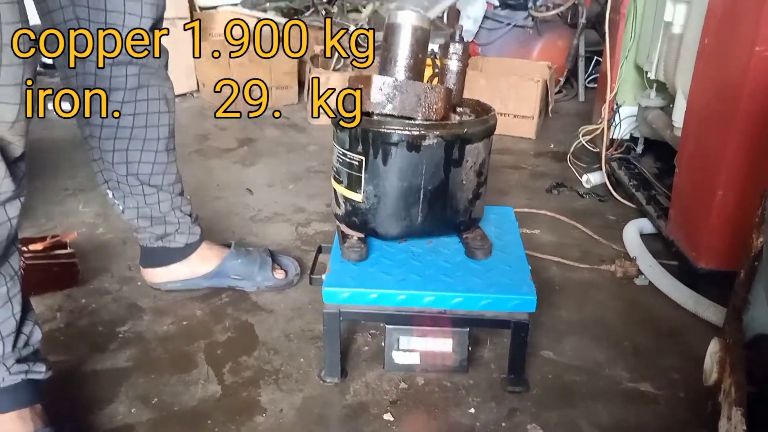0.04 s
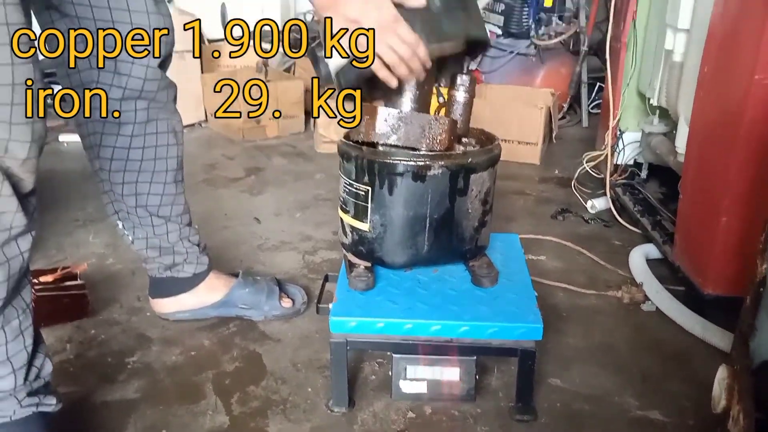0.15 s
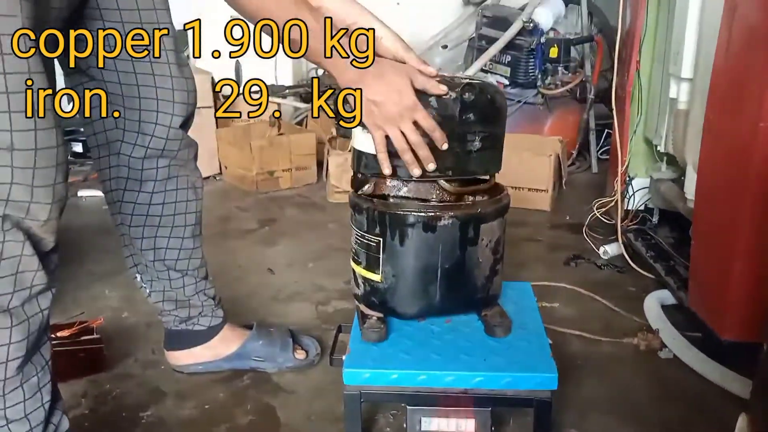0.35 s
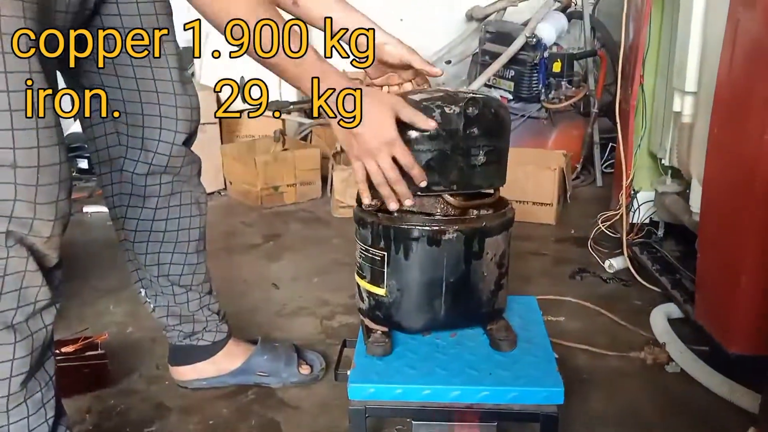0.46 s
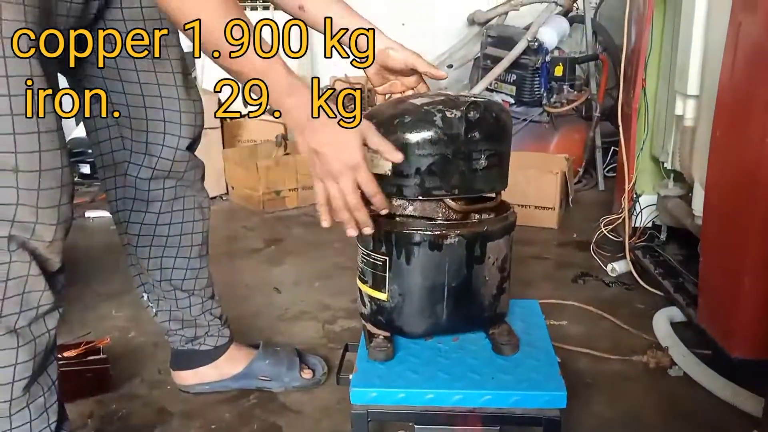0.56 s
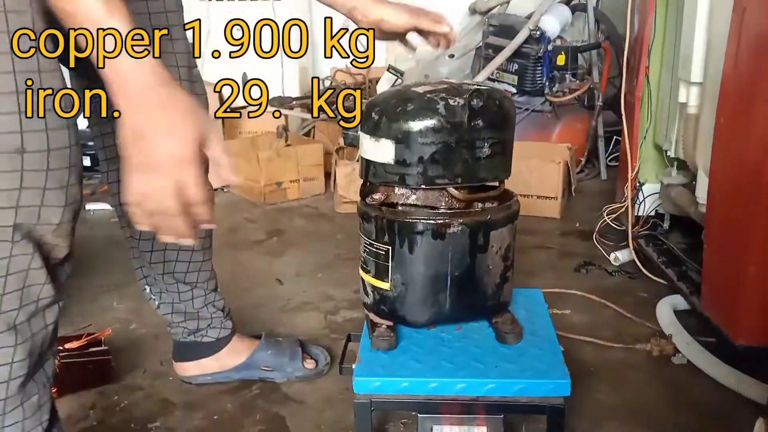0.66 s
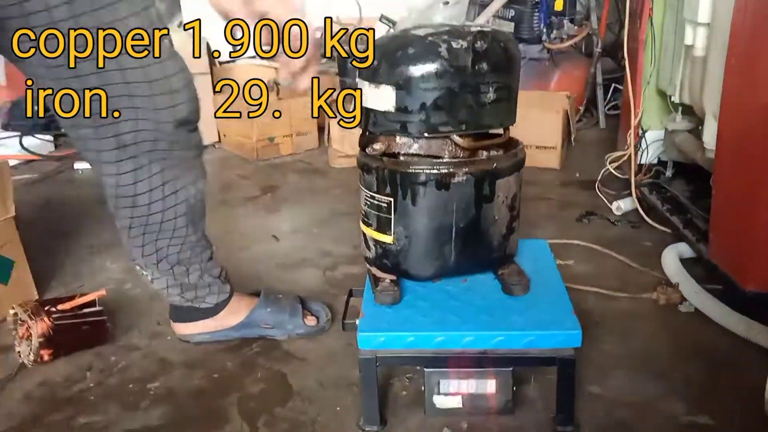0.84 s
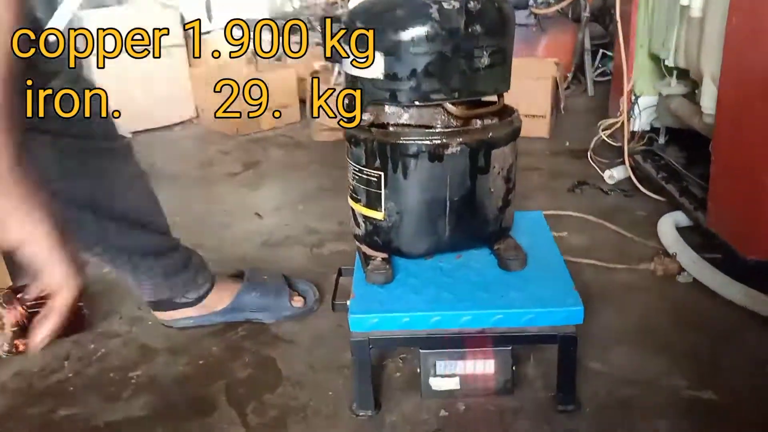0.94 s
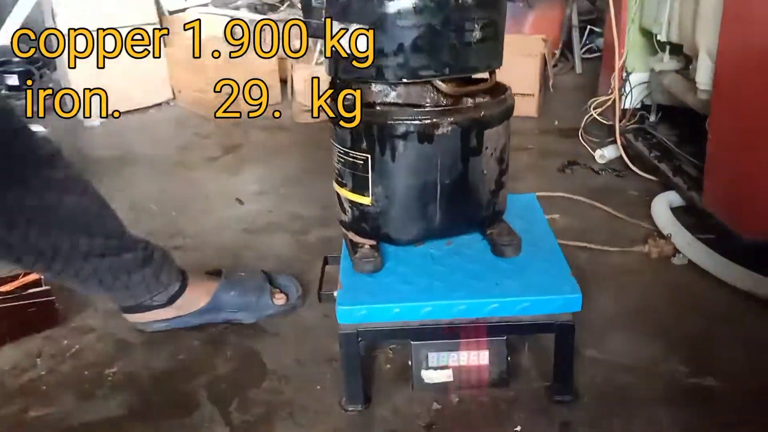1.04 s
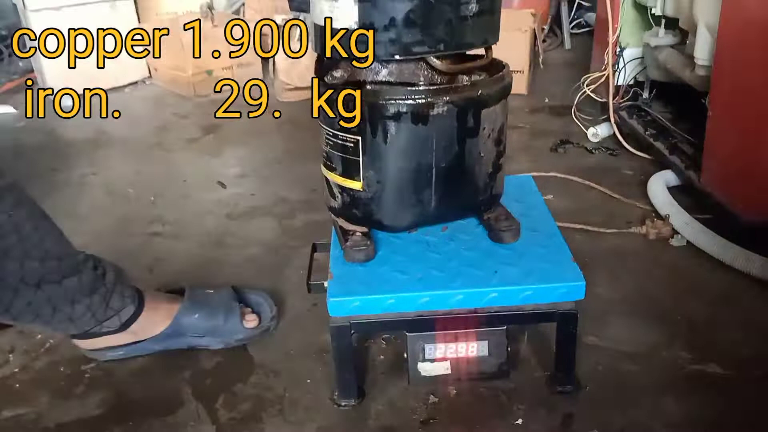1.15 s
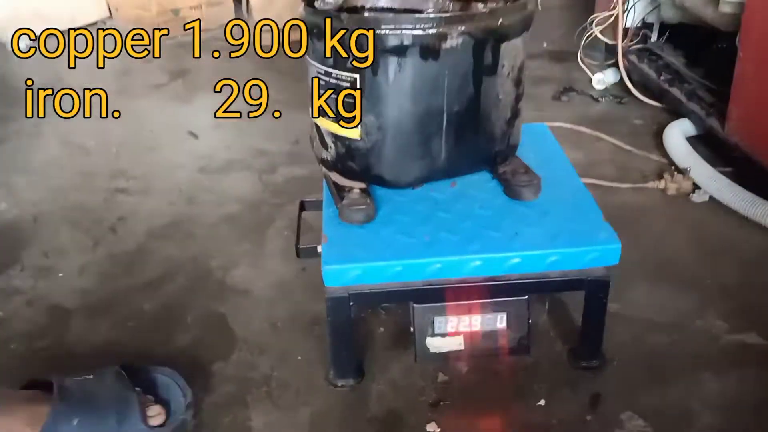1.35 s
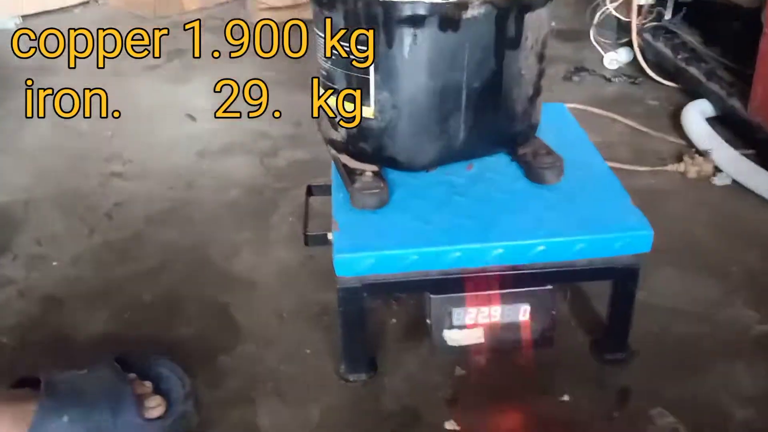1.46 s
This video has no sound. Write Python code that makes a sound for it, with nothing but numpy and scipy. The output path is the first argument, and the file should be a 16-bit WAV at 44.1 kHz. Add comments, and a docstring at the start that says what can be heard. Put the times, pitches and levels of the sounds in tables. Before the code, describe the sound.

Close microphone in a workshop: faint stirrings, then a hard double-edged steel clank at the start, its ring dropping in steps, followed by soft ticks, gritty foot scuffs, and a late quiet knock over low rumble and hiss.

```python
"""A heavy steel lid is knocked down onto its shell on a platform scale in a workshop: many ringing modes.
Each ring's fading jumps ahead at regular splices, as in sound sped up by dropping pieces: it falls in steps.
A late bump is made of short dull platform tones with a ring around it. A sandal scuffs the floor as gritty
noise, and very high, faint squeaks are narrow noise. Low rumble, hum and hiss of shaped noise fill the shop."""
import sys
import numpy as np
from scipy import signal
from scipy.fft import rfft, irfft
from scipy.io import wavfile
from scipy.ndimage import uniform_filter1d

SR = 44100
rng = np.random.default_rng(int(sys.argv[2]) if len(sys.argv) > 2 else 0)


def store_pcm(level_fs):
    """Save levels as 16-bit WAV."""
    pcm = np.round(np.clip(level_fs, -1, 1) * 32767).astype(np.int16)
    wavfile.write(sys.argv[1], SR, np.atleast_2d(pcm).T)


def attenuation_scalar(level_db):
    """Turn a level in dB into a linear amplitude multiplier (20 dB per decade)."""
    decades = np.asarray(level_db, float) / 20
    return 10 ** decades


N = 66150  # samples: 1.5 s


def evened(x):
    """Scales a sound to an rms of 1."""
    return x / np.sqrt(np.mean(x ** 2) + 1e-20)


def read(points, hz):
    """Reads a table at any pitch, with straight lines on a log-frequency axis."""
    f, value = np.transpose(points)
    return np.interp(np.log(hz + 1), np.log(f + 1), value)


def curve(points):
    """Turns a level curve in dB into a gain for every sample."""
    return attenuation_scalar(np.interp(np.arange(N) / SR, *np.transpose(points)))


def add(mix, start_s, sound):
    """Mixes a sound in at its start time, cutting off what runs past the end."""
    part = mix[:, round(start_s * SR):][:, :sound.shape[-1]]
    part += sound[..., :part.shape[1]]


def swell(start_s, length_s):
    """A smooth rise and fall, half a sine long."""
    return np.sin(np.pi * np.clip((np.arange(N) / SR - start_s) / length_s, 0, 1))


def ring(t, age, hz, db, t60, left, right, lean_db):
    """Ringing modes as a sum of dying sines, with one set of starting phases per channel."""
    fading = 3 * np.log(10) * age / t60[:, None]  # 60 dB down when the age reaches t60
    turns = np.exp(2j * np.pi * hz[:, None] * t - fading)
    gains = attenuation_scalar(db + np.array([[.5], [-.5]]) * lean_db)
    starts = np.exp(1j * np.array([left, right]))
    return np.imag(gains * starts @ turns)


def stepped_age(start_s, t):
    """Age of a ring: it runs with time and jumps ahead at every splice, so the fading falls in steps."""
    piece_s, piece_at_s = 2048 / 48000, .2022  # spacing of the splices, time of one of them
    dropped_s, splice_s = 0.16, 0.0064  # time lost at each splice, length of its crossfade
    pieces = np.floor((start_s + t - piece_at_s) / piece_s)
    first = np.floor((start_s + splice_s - piece_at_s) / piece_s)
    splices = np.maximum(pieces - first, 0)
    return t + dropped_s * uniform_filter1d(splices, max(round(splice_s * SR), 1), mode="nearest")


def steel_ring(start_s, level_db, centre_hz, octaves, long, chance):
    """One burst of ringing from the set of steel modes, strongest near the colour's centre."""
    # strong modes of the steel shell: pitch_hz, level_db, t60_s (before the burst's ring length factor)
    strong_modes = [(270, -4, 0.74), (439, -4, 0.13), (467.2, 1.5, 0.12), (515.8, 1.5, 0.29),
                    (715, 0, 0.17), (762.6, -7.5, 0.67), (1291, -8, 0.12), (1585, 5.5, 0.082),
                    (1848, -7.5, 0.22), (1951, -4, 0.48), (2437, -1, 0.17), (2775, -6, 0.45),
                    (3265, -17, .4), (3776, -4, 0.2), (4100, -2, 0.093), (4440, -16, 0.16),
                    (4670, -8, 0.22), (5115, -6, 0.13), (5790, -5, 0.33), (6210, -7.5, 0.43),
                    (6730, -13, 0.34), (7920, -19.5, 0.33), (8430, -18, .3), (9055, -20, 0.35),
                    (9900, -44, 0.14), (11340, -27.5, 0.72), (11660, -36, .4), (13300, -20, .3),
                    (14600, -25, 0.4)]
    # many weak modes and echoes, general colour: pitch_hz, level_db
    crowd_colour = [(71, -57), (120, -14), (331, -13), (506, -5.5), (1420, -8), (1570, -8.5), (1740, -12.5),
                    (2410, -9.5), (3010, -15.5), (3920, -14), (6250, -20), (7350, -38.5), (15200, -52)]
    # middle ring time of the weak modes, before the same factor: pitch_hz, t60_s
    crowd_ring = [(150, 0.2), (500, 0.32), (2000, 0.35), (6000, 0.55), (15000, 0.28)]
    # left-right balance of the ring: pitch_hz, left_minus_right_db
    balance = [(60, -10), (180, -5.5), (540, 0), (1630, -0.5), (4920, -0.5), (14800, -8)]
    strong_scatter = 0.2  # share of a cycle by which the strong modes start out of step
    crowd_db, crowd_spread_db, crowd_same = -4.5, 2.5, 0.5
    rise_cycles, far_db = 0.74, 25.5  # rise time in cycles of the centre; deepest cut of far modes

    t = np.arange(round(.16 * SR)) / SR
    place, phase, turn = chance
    strong_hz, strong_db, strong_t60 = np.transpose(strong_modes)
    count = len(strong_hz)

    many_hz = 120 + 15200 * place ** 2  # packed closer at low pitches
    many_db = read(crowd_colour, many_hz) + 5 * np.log10(many_hz / 1000) + crowd_db
    many_db = many_db + crowd_spread_db * turn[::-1] * np.clip(many_hz / 5000, .4, 1.6)
    many_t60 = read(crowd_ring, many_hz) * (.6 + .8 * phase)

    hz = np.r_[strong_hz, many_hz]
    db = np.r_[strong_db, many_db]
    t60 = long * np.r_[strong_t60, many_t60]
    db = db - np.minimum(7.0 * (np.log2(hz / centre_hz) / octaves) ** 2, far_db)

    # the channels drift out of step as pitch rises to 900 Hz
    left = 2 * np.pi * np.r_[strong_scatter * phase[:count], phase[::-1]]
    apart = np.r_[turn[:count], np.pi * (1 - crowd_same) * turn]
    right = left + apart * np.minimum(hz / 900, 1)

    sound = ring(t, stepped_age(start_s, t), hz, db, t60, left, right, read(balance, hz))
    sound = sound / np.sqrt(np.sum(attenuation_scalar(db) ** 2) / 2)  # the same strength however many modes sound
    return attenuation_scalar(level_db) * sound * (1 - np.exp(-t * centre_hz / rise_cycles))


def steel_rings():
    """Knocks and ringing tails of the lid and shell, then the ring around a late bump and its tail."""
    # bursts (from 1.4405 s on: the late bump's): start_s, level_db, centre_hz, colour_width_octaves,
    # ring_length_factor
    bursts = [(.043, -33.5, 300, 2, .5), (0.056, -45, 248, 0.93, 0.65), (.1, -42, 436, 1.2, .5),
              (0.162, -45.5, 2960, 4.5, 1.8), (.2027, -13, 860, 0.86, 0.055), (.2032, -33.5, 6900, 1.2, 2),
              (0.208, -21.5, 1570, 1.12, 1.6), (0.2184, -14.5, 4120, 0.25, 0.81),
              (.2195, -28.5, 9700, 0.44, 0.13), (.2213, -9, 490, 0.5, .25),
              (.2216, -11.5, 910, 0.56, 0.056), (0.2261, -14, 1800, 1.96, 2.1),
              (0.2422, -19, 2380, 2.26, 1.46), (0.2423, -28, 270, 0.29, 0.59),
              (.2515, -24, 3980, 0.34, .15), (.277, -39.5, 600, 1.2, .3), (.371, -40, 780, 0.58, 1.07),
              (.372, -48, 270, 0.38, 0.48), (0.395, -48.5, 4100, 0.13, 0.43),
              (.426, -43.5, 3000, 1.8, 0.69), (0.445, -40, 1060, 0.58, 0.14), (.63, -48.5, 620, 0.66, 0.82),
              (0.721, -52, 596, 1.1, 0.47), (.962, -43, 450, 2.3, 0.28), (1.4405, -38, 2000, .8, 0.11),
              (1.447, -31, 5850, 2.7, 0.16), (1.463, -42, 1480, 0.35, 1.4), (1.481, -44.5, 1000, 0.45, 1.8)]
    out = np.zeros((2, N))
    for row in bursts:
        place = (np.arange(300) + rng.random(300)) / 300  # spread evenly, with a little chance
        chance = (place, rng.random(300), rng.standard_normal(300))
        add(out, row[0], steel_ring(*row, chance))
    return out


def platform_bumps():
    """Bumps set off the platform's dull modes, which die within a fraction of a second."""
    # modes of the platform: pitch_hz, level_db (before the bump's level), t60_s
    dull_modes = [(110, -2.5, 0.13), (175, 2.5, 0.043), (235, -32, 0.025), (888, -7.5, 0.055),
                  (1000, -0.5, 0.044), (1060, 9, 0.026), (1440, -3.5, 0.028), (1700, 4, 0.042),
                  (2010, 5, 0.019), (2580, -0.5, 0.032), (3230, -5.5, 0.026), (5104, -4.5, 0.024),
                  (6400, -21, 0.011)]
    # bumps: start_s, level_db (added to each mode's level)
    hits = [(1.4467, -32), (1.4505, -31.5), (1.457, -49)]
    rise_s, lean_db = 0.00097, -7  # the right side is louder
    out, t = np.zeros((2, N)), np.arange(SR // 10) / SR
    hz, db, t60 = np.transpose(dull_modes)
    for start_s, level_db in hits:
        left = 2 * np.pi * rng.random(len(hz)) * (hz > 500)  # low modes start in step
        right = left + 0.76 * np.minimum(hz / 1000, 2)
        bump = ring(t, t, hz, db + level_db, t60, left, right, lean_db)
        add(out, start_s, bump * (1 - np.exp(-t / rise_s)))
    return out


def noise(colour, patchy_db, flicker_db):
    """Two-channel noise from random short-time spectra, uneven in patches and flickering as a whole."""
    # likeness of left and right: pitch_hz, likeness (1 same, 0 unrelated, below 0 opposed)
    likeness = [(60, 1), (150, 1), (380, 0.7), (940, -0.11), (2360, -0.1), (5910, 0.5), (14800, 1)]
    frames, hz = N // 128 + 9, np.fft.rfftfreq(512, 1 / SR)
    a, b, c, d, patches = rng.standard_normal((frames, 257, 5)).T
    patches = uniform_filter1d(patches, size=5, axis=0)  # along pitch
    patches = evened(uniform_filter1d(patches, size=14, axis=1))  # along time
    flicker = evened(uniform_filter1d(rng.standard_normal(frames), size=4))

    same = np.clip(read(likeness, hz), -1, 1)[:, None]
    left = a + 1j * b
    right = same * left + np.sqrt(1 - same ** 2) * (c + 1j * d)
    spectra = np.array([left, right]) * attenuation_scalar(patchy_db * patches + flicker_db * flicker)
    x = signal.istft(spectra, nperseg=512, noverlap=384)[1][:, :N]
    gains = attenuation_scalar(read(colour, np.fft.rfftfreq(N, 1 / SR)))
    return evened(irfft(rfft(x) * gains, N))


def scuffs():
    """A sandal on concrete: gritty friction noise swells and fades with each slide."""
    # colour of the friction: pitch_hz, level_db
    grit_colour = [(410, -21.5), (700, -10), (883, -9), (1040, -7), (1330, -5.5), (1500, -3), (2090, 3),
                   (3740, -12.5), (6180, -9), (9840, -33.5), (15200, -31.5)]
    # slides: start_s, length_s, level_db
    slides = [(0.711, 0.15, -50.5), (1.047, 0.19, -46), (1.206, 0.25, -45)]
    gain = sum(attenuation_scalar(db) * swell(start_s, length_s) ** 0.65 for start_s, length_s, db in slides)
    return noise(grit_colour, 4.3, 0.7) * gain


def squeaks():
    """Fuzzy high whistles: slow random wobble, made by two equal resonances, is moved up to each pitch."""
    # whistles: start_s, length_s, level_db, pitch_hz
    whistles = [(.535, 0.042, -94, 13400), (.64, .045, -90, 13750), (0.836, 0.24, -75.5, 11880)]
    resonance_hz = 190  # width of each resonance; the two together are narrower
    r = np.exp(-np.pi * resonance_hz / SR)
    t, out = np.arange(N) / SR, 0
    for start_s, length_s, db, hz in whistles:
        grain = rng.standard_normal(N) + 1j * rng.standard_normal(N)
        fuzz = signal.lfilter([1], np.poly([r, r]), grain)
        whistle = evened(np.real(fuzz * np.exp(2j * np.pi * hz * t)))
        out = out + attenuation_scalar(db) * swell(start_s, length_s) * whistle
    return out


def rumble():
    """Low noise of the shop, rising and falling along a level curve."""
    # colour: pitch_hz, level_db
    low_colour = [(12, -66), (20, -36), (32, -39), (45, -18), (86, -2), (146, -8.5), (190, -9), (250, -48),
                  (420, -120)]
    # level curve in three stretches: start_s, level_db
    low_level = [
        [(0.0, -44), (0.016, -40), (0.094, -48), (0.114, -43), (0.138, -40), (0.182, -43.5), (0.2, -45)],
        [(0.3, -55), (0.384, -51.5), (0.4, -56), (0.558, -51.5), (1.144, -48), (1.21, -50), (1.228, -52),
         (1.31, -48.5), (1.394, -51), (1.425, -43)],
        [(1.475, -46.5), (1.479, -46.5), (1.5, -51)],
    ]
    return curve(sum(low_level, [])) * noise(low_colour, 0.51, 0.99)


def hum():
    """A fuzzy band of noise above the deepest rumble, with a level curve of its own."""
    # colour: pitch_hz, level_db
    band_colour = [(150, -15), (200, 2.5), (255, 12), (300, 4), (360, -50.5)]
    # level curve: start_s, level_db
    band_level = [(0, -46), (.1, -51), (.2, -46.5), (.33, -53), (.45, -53), (.7, -67), (.85, -59.5),
                  (1.0, -55), (1.1, -60.5), (1.3, -65), (1.5, -59)]
    return curve(band_level) * noise(band_colour, patchy_db=.9, flicker_db=1.8)


def hiss():
    """Broad shop noise, strongest in the middle pitches, with a slowly moving level."""
    # colour: pitch_hz, level_db
    broad_colour = [(190, -13), (330, -10.5), (680, -2.5), (748, -10.5), (858, -7), (996, -7), (1080, -5.5),
                    (1610, -7.5), (2730, -7.5), (3540, -21.5), (6460, -22), (8600, -43.5), (11200, -80),
                    (18900, -120)]
    # level curve: start_s, level_db
    broad_level = [(0, -42.5), (.06, -44), (.14, -44.5), (.3, -46), (.48, -51), (.65, -46.5), (.8, -50.5),
                   (.9, -48), (1.0, -46), (1.2, -50), (1.5, -44.5)]
    return curve(broad_level) * noise(broad_colour, patchy_db=1.9, flicker_db=1.0)


def scene():
    """Steel rings, platform bumps, scuffs and squeaks over the shop's rumble, hum and hiss."""
    struck = steel_rings() + platform_bumps()
    background = rumble() + hum() + hiss()
    return struck + scuffs() + squeaks() + background


def low_pass(x):
    """Removes everything above the highest recorded frequency."""
    return signal.sosfilt(signal.butter(12, 15400, fs=SR, output="sos"), x)


def record(dry):
    """Rounds off the peaks smoothly under a ceiling and finishes the mix."""
    ceiling = .97  # of full scale
    rounded = dry / (1 + (abs(dry) / ceiling) ** 10) ** (1 / 10)
    return low_pass(rounded)


dry = scene()
out = record(dry)
store_pcm(out)
```